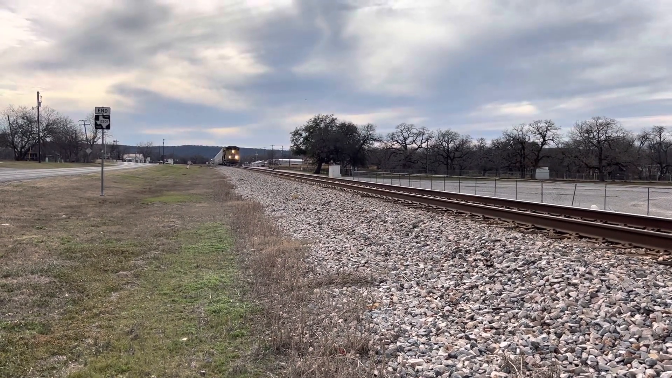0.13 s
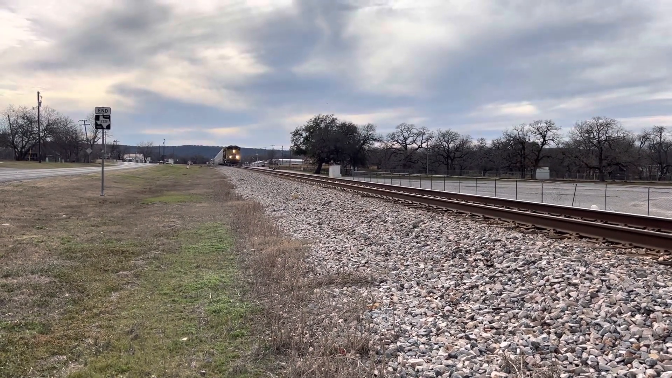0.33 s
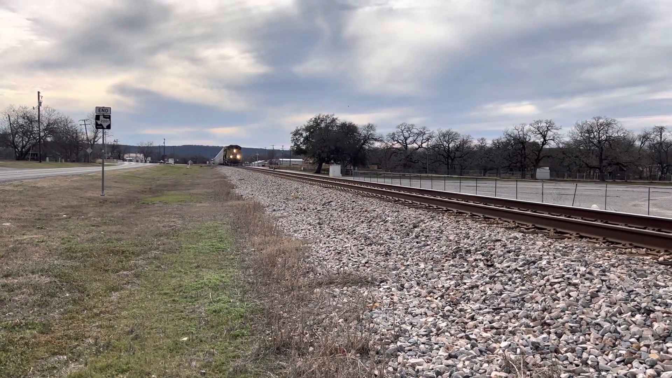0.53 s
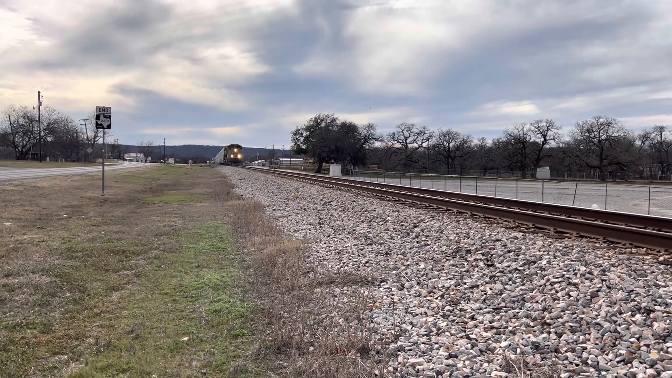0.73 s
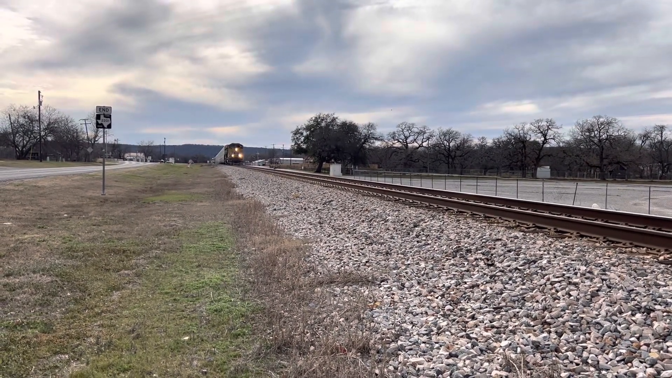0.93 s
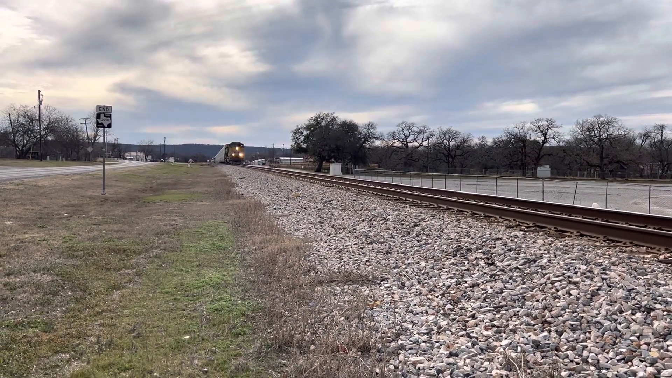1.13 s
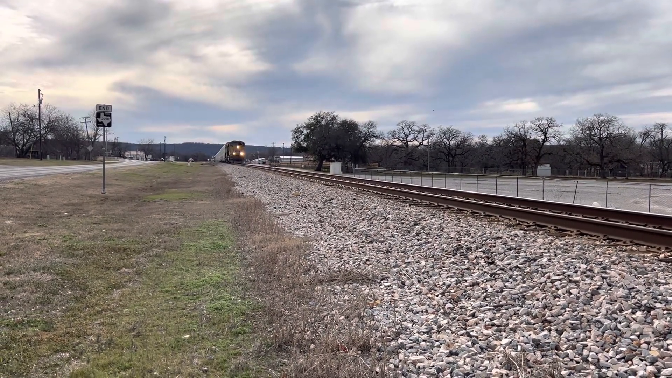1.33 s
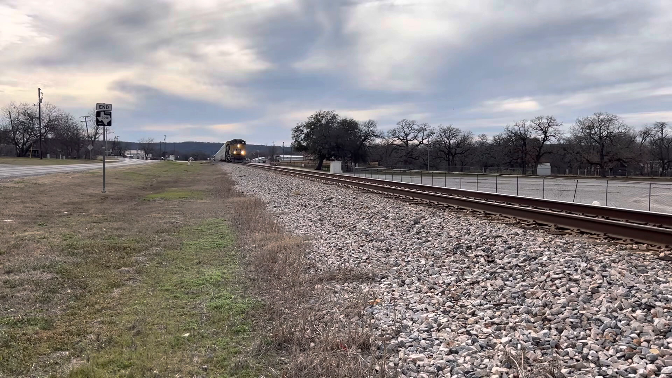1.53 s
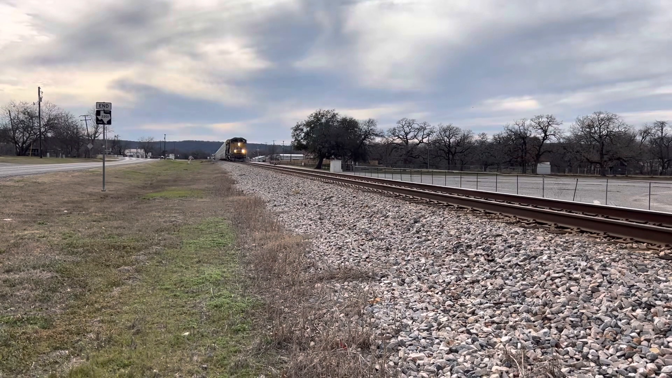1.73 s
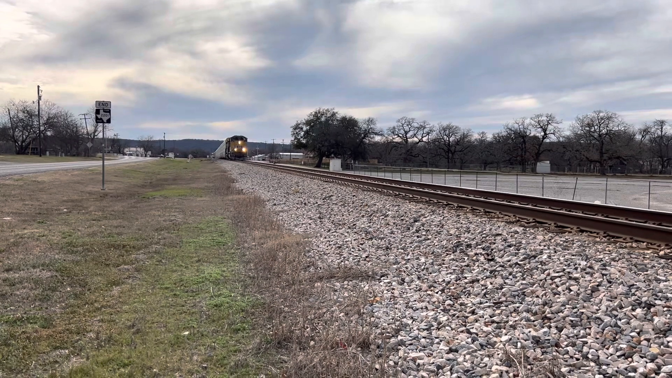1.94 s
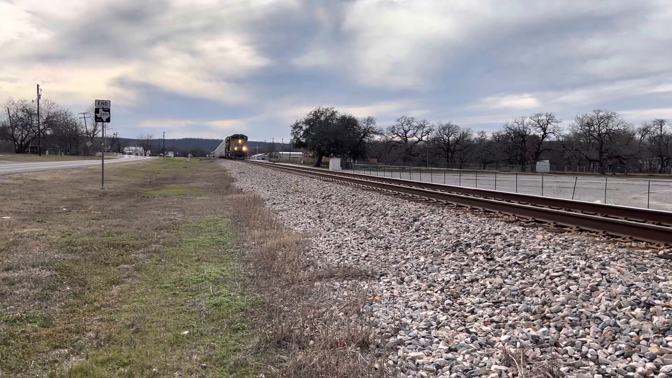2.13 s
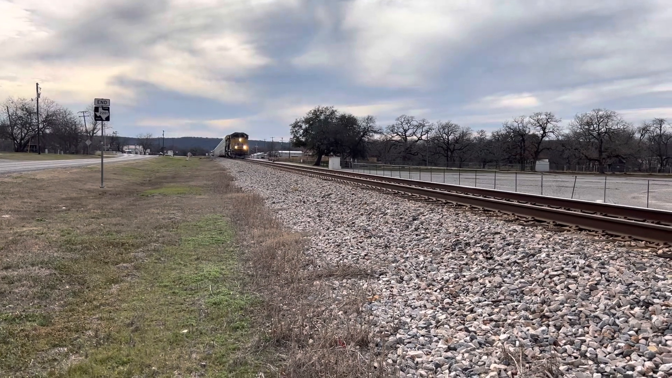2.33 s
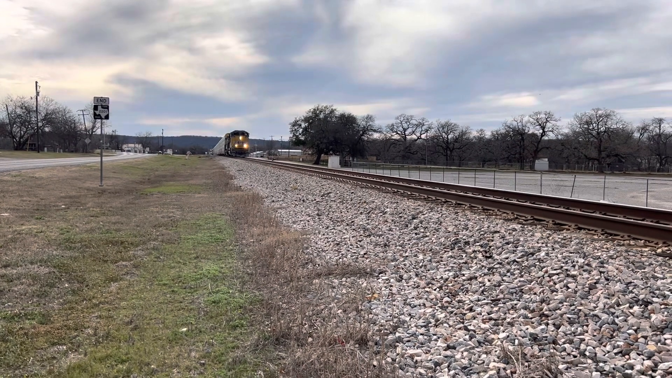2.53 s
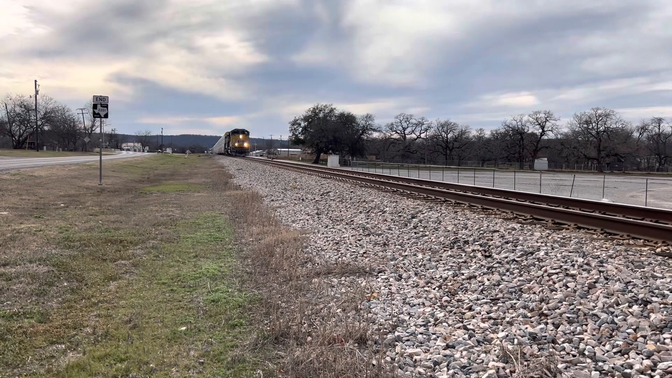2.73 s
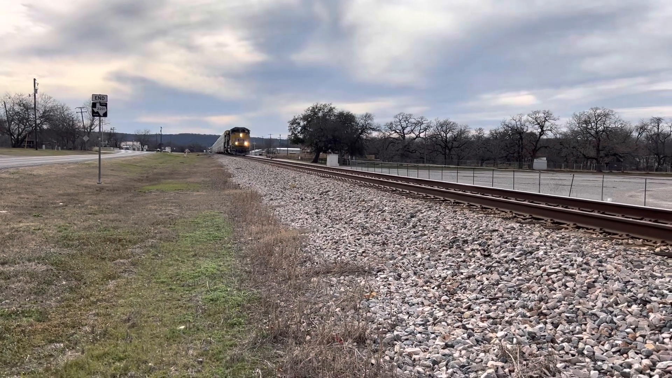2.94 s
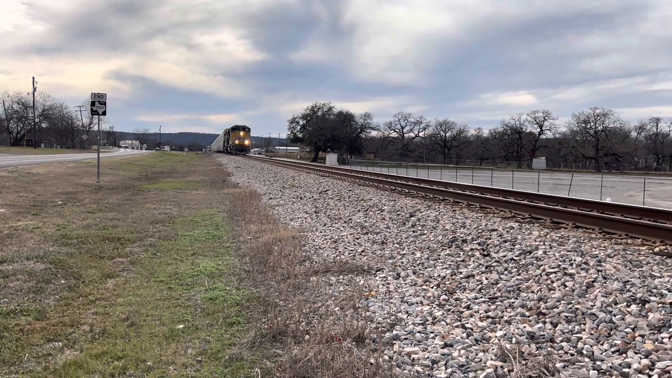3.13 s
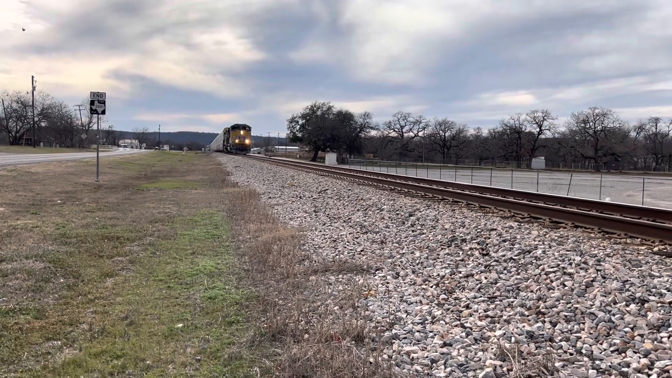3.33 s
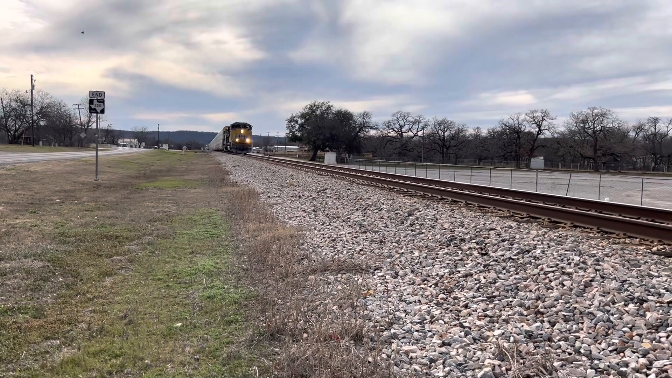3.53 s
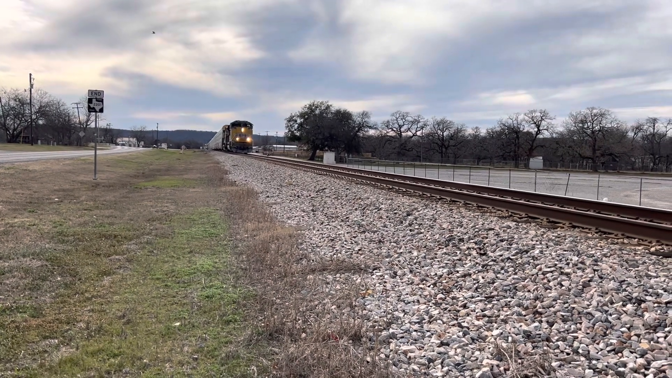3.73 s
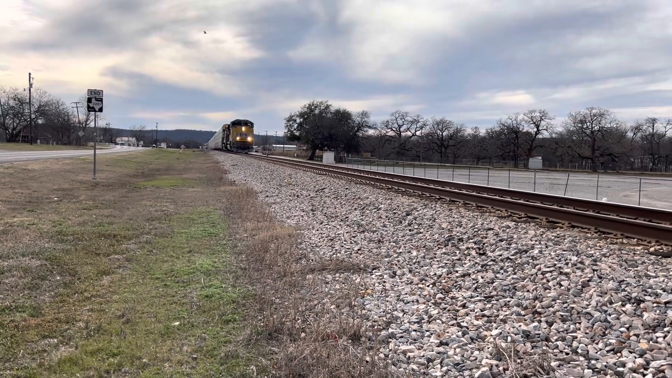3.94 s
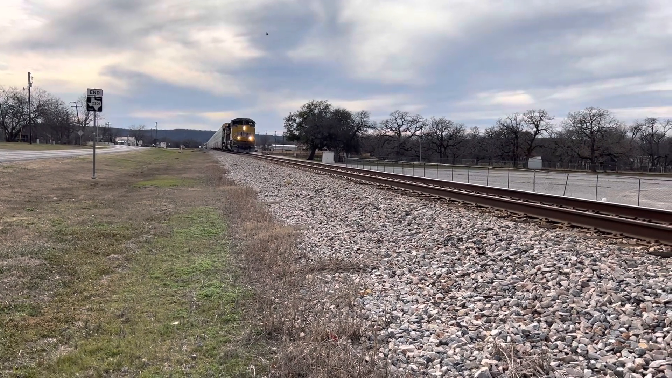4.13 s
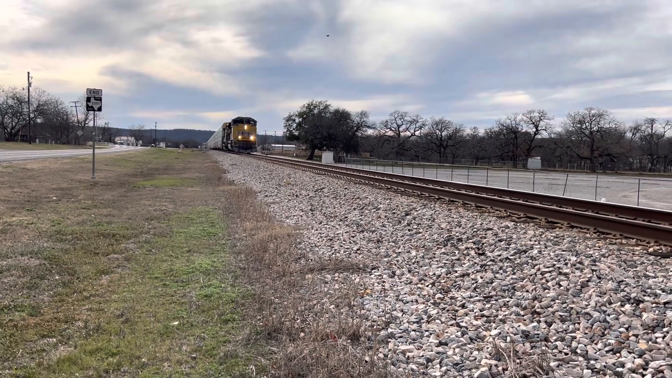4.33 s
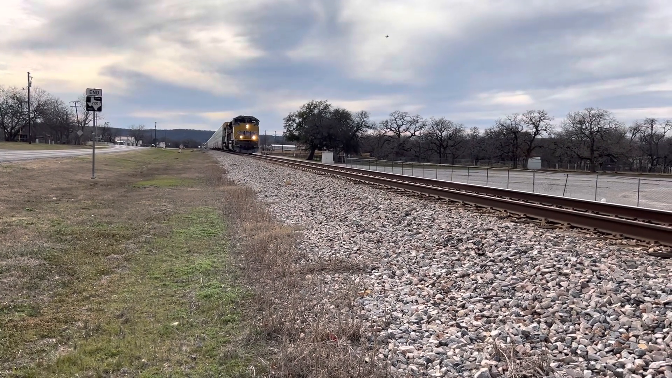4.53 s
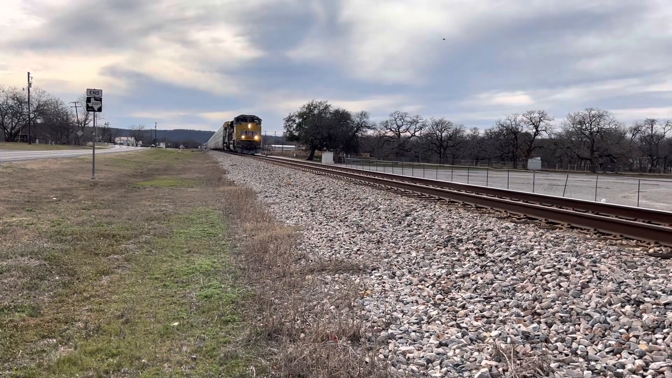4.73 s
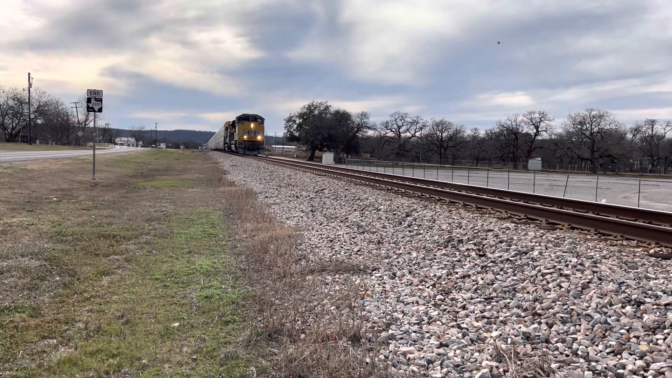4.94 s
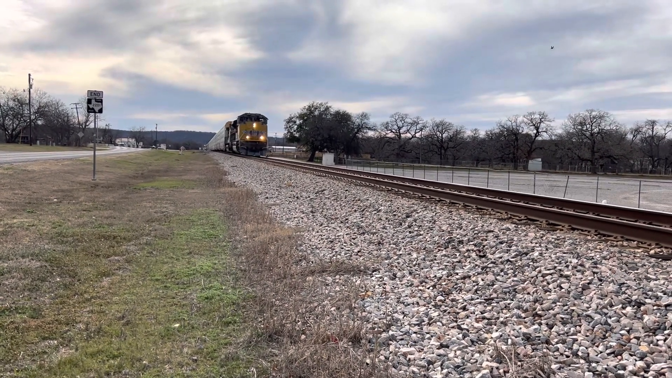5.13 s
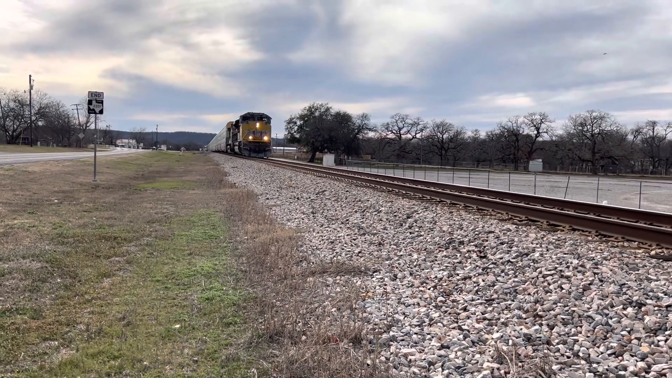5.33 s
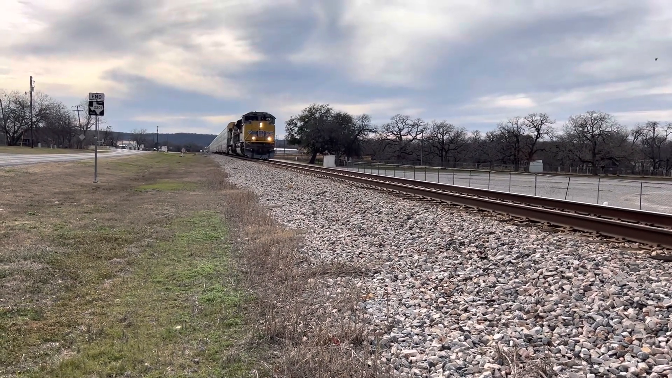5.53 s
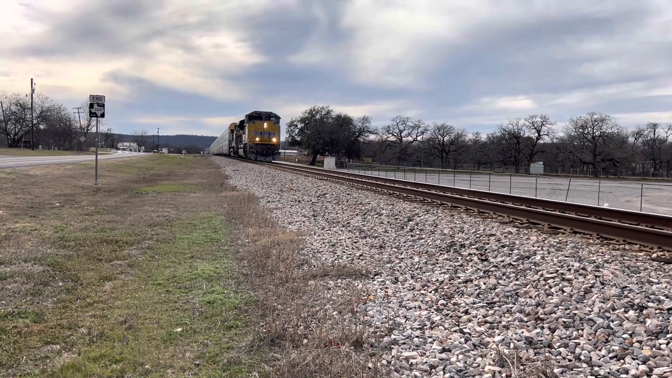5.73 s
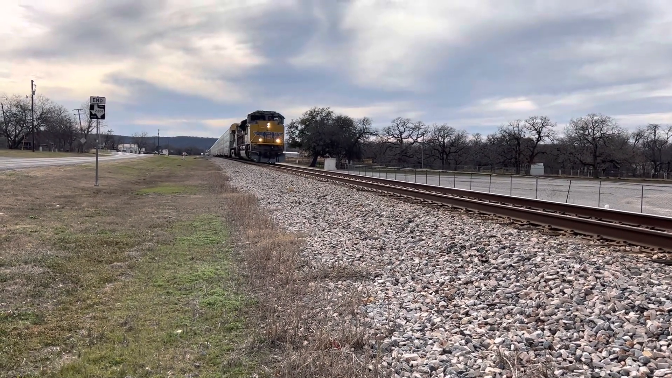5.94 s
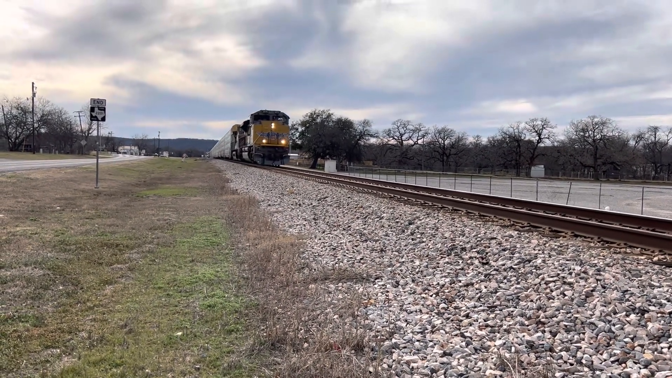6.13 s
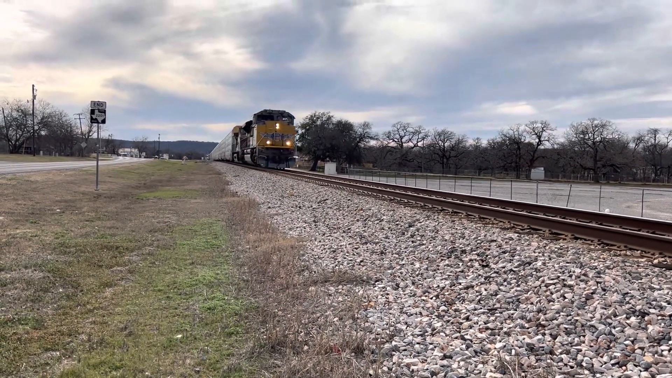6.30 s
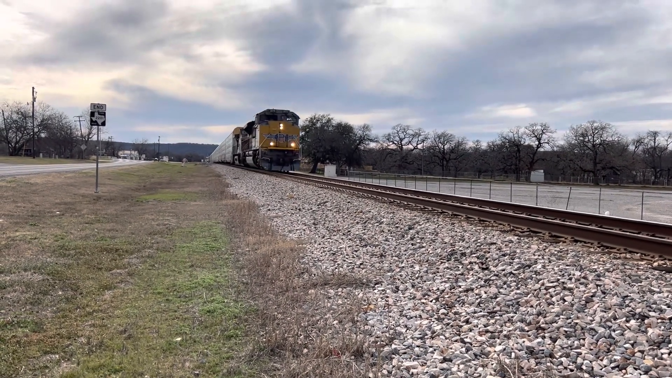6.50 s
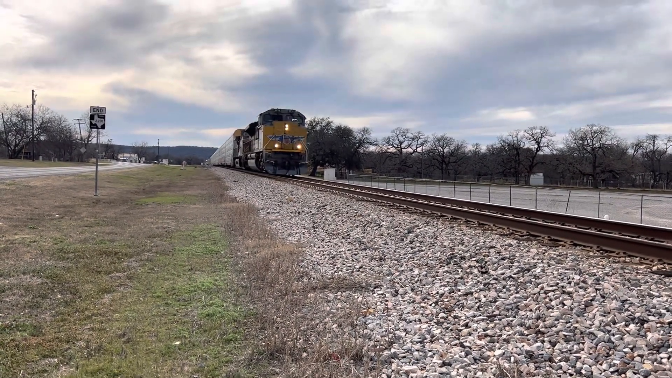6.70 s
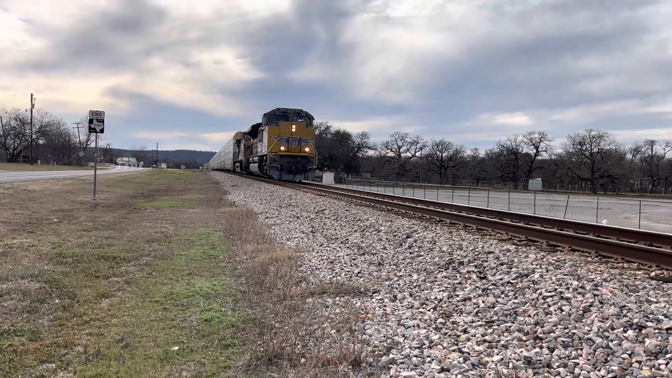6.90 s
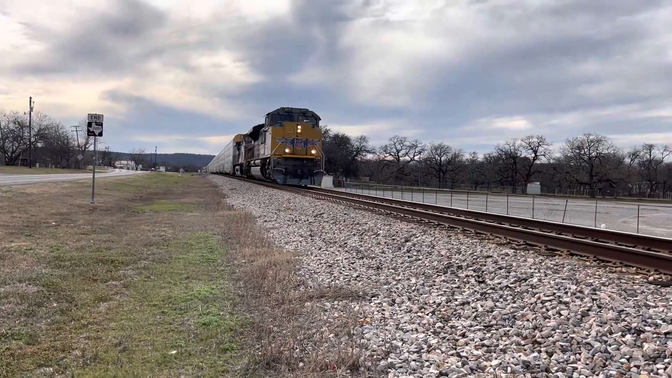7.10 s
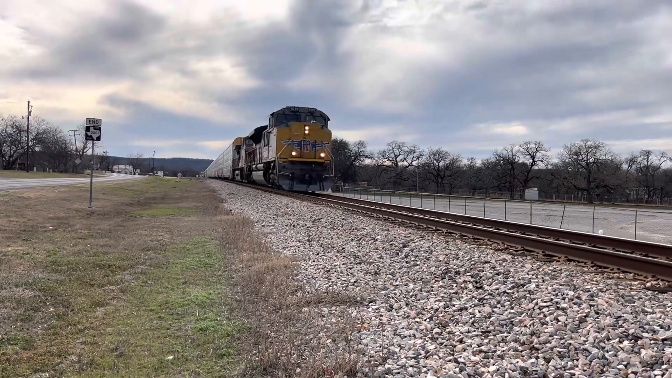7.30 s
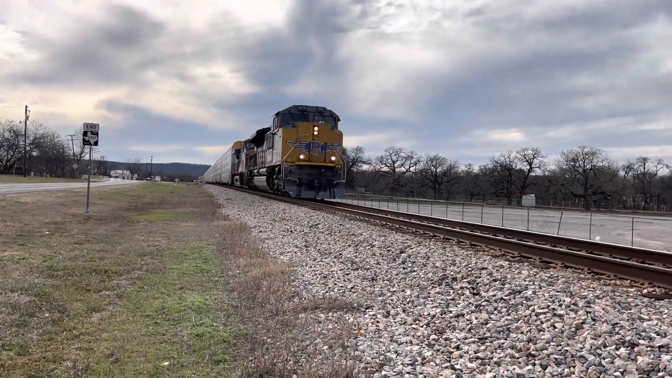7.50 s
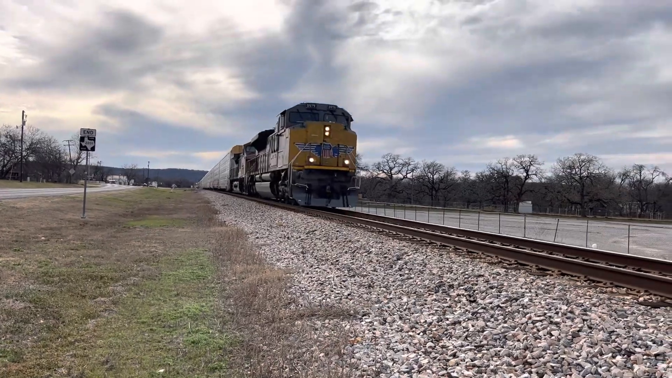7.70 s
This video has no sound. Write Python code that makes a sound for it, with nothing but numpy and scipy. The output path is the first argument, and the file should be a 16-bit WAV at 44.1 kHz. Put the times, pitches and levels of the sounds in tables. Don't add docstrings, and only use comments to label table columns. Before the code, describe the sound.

Distant locomotives throb and hum steadily louder from the trackside, with faint rail zings, an air hiss, one wind thump, and a brightening final roar.

```python
import sys
import numpy as np
from scipy import signal
from scipy.fft import rfft, irfft, next_fast_len
from scipy.io import wavfile
from scipy.ndimage import uniform_filter1d, map_coordinates

SR = 44100
rng = np.random.default_rng(int(sys.argv[2]) if len(sys.argv) > 2 else 0)


def linear_from_db(decibels):
    return 10 ** (np.asarray(decibels, float) / 20)


def unload_wav(signal):
    wavfile.write(
        sys.argv[1],
        SR,
        np.round(np.clip(np.atleast_2d(signal).T, -1, 1) * 32767).astype(np.int16),
    )


N = 346615
TIME = np.arange(N) / SR


def unit(x):
    return x / np.sqrt(np.mean(x ** 2) + 1e-20)


def along(points, hz):
    f, v = np.transpose(points)
    return np.interp(np.log(hz + 1), np.log(f + 1), v)


def colour(spectrum):
    return lambda hz: linear_from_db(along(spectrum, hz))


def wobble(rate):
    knots = rng.standard_normal(int(N * rate / SR) + 4)
    return map_coordinates(knots, [np.arange(N) * rate / SR])


def bell(s, length):
    return np.exp(-2 * (2 * (TIME - s) / length) ** 2)


def tone(hz, rough):
    return np.sqrt(2) * np.sin(2 * np.pi * np.cumsum(hz) / SR + rough * wobble(12))


def nearness():
    arrival_s = 9.147
    return -20 * np.log10(arrival_s - TIME)


def filtered(x, response):
    m = next_fast_len(N + SR // 2)
    return irfft(rfft(x, m) * response(np.fft.rfftfreq(m, 1 / SR)), m)[..., :N]


def rush(gain, alike, lead, patchy_db):
    z = signal.stft(rng.standard_normal((2, N)), nperseg=512)[2]
    field = rng.standard_normal(z.shape[1:])
    field = uniform_filter1d(uniform_filter1d(field, 5, 0), 12, 1)
    pair = signal.istft(z * linear_from_db(patchy_db * unit(field)), nperseg=512)[1][:, :N]

    def mix(hz):
        turn = np.arccos(np.clip(alike(hz), -1, 1)) / 2
        return gain(hz) * np.array([np.cos(turn), np.sin(turn)])

    def shift(hz):
        return np.exp(.5j * lead(hz) * np.array([[-1], [1]]))

    mid, side = filtered(pair, mix)
    return unit(filtered(np.array([mid + side, mid - side]), shift))


# frequency in Hz, likeness from 0 to 1.
PORT_LIKENESS = [(50, .995), (100, .988), (170, .95), (270, .94), (400, .8), (650, .55), (1000, .2),
                 (1500, .4), (2200, .72), (2800, .6), (3400, .5), (4000, .72), (5000, .4), (8000, .45)]
# frequency in Hz, lead of the right in radians.
RIGHT_LEAD = [(50, -.05), (200, -.17), (400, .25), (650, -.2), (800, -.7), (1200, -1.3), (1500, -3.1),
              (1800, -4.5), (2200, -6.5), (2800, -7.5), (3400, -7.1), (4000, -6.7), (8000, -6.7)]
# frequency in Hz, left over right in dB.
LEFT_OVER_RIGHT = [(50, .4), (550, 0), (800, 1.5), (1200, 1), (1600, -1.5), (2200, -.3), (3200, 2.5),
                   (4000, 1.5), (6000, 2.5), (7500, 0)]


def ahead(gain, patchy_db):
    noise = rush(gain, lambda hz: along(PORT_LIKENESS, hz), lambda hz: along(RIGHT_LEAD, hz), patchy_db)
    return filtered(noise, lambda hz: linear_from_db(along(LEFT_OVER_RIGHT, hz) * np.array([[.5], [-.5]])))


# time in seconds, level of the firing order in dB.
FIRING = [(0, -27), (1.5, -27), (2.2, -24), (2.7, -28), (3.05, -23.5), (3.35, -26), (3.75, -20.5),
          (4.25, -23.5), (4.8, -20), (5.3, -24.5), (6, -20.5), (6.5, -20.5), (7.2, -19), (7.55, -17.5),
          (7.86, -22.5)]


def firing_db():
    s, db = np.transpose(FIRING)
    return np.interp(TIME, s, db)


# order in cycles, level in dB, unsteadiness in dB.
ENGINE_ORDERS = [(5.87, -27.5, 1), (7.02, -11.5, 1.5), (8.026, 0, 0.96), (8.954, -9.5, 1.5),
                 (10.04, -17, 2), (11.02, -19, 2), (11.875, -15, 2), (12.93, -18, 1.5), (15.29, -20.5, 2.5),
                 (16.2, -26, 5.5), (17.96, -28.5, 2.5), (23.5, -37, 7), (27.37, -38.5, 4)]


def exhaust():
    cycle = 2 * np.pi * 51.7 / 8 * TIME
    lines = 0
    for order, db, drift in ENGINE_ORDERS:
        strength = linear_from_db(db + drift * wobble(2.49))
        phase = 0.21 * drift * wobble(1.475) + 2 * np.pi * rng.random()
        lines = lines + strength * np.sin(order * cycle + phase)
    lines = np.sqrt(2) * linear_from_db(firing_db()) * lines
    return np.array([lines, np.roll(lines, 9)]) * linear_from_db([[.2], [-.2]])


# frequency in Hz, density in dB per Hz.
RUMBLE = [(15, -44.5), (30, -22.5), (42, -10.5), (52, 2), (64, -8), (81, -6), (102, -10.5), (140, -15.5),
          (200, -19.5), (240, -28.5), (350, -31.5), (460, -71.5), (800, -120)]


def engine_rumble():
    carried_db = uniform_filter1d(firing_db(), size=SR)
    follows_db = 0.99 * (carried_db - carried_db.mean())
    level_db = -27 + 0.42 * nearness() + follows_db
    return linear_from_db(level_db + 0.57 * wobble(2.4)) * ahead(colour(RUMBLE), patchy_db=1.0)


# frequency in Hz, density in dB per Hz.
ROAR = [(150, -34), (250, -3), (500, -5), (1000, -11.5), (2000, -18.5), (3200, -27), (5000, -33.5),
        (7000, -43.5), (9000, -45), (12000, -79.5), (20000, -120)]
# frequency in Hz, density in dB per Hz.
HISS = [(1500, -42), (3000, -10), (5000, -6.5), (6000, 0.5), (7500, 1), (9000, -0.5), (12000, -46.5)]


def roar():
    near_db = nearness()
    broad = linear_from_db(1.293 * near_db - 29.5 + 0.39 * wobble(4.9)) * ahead(colour(ROAR), patchy_db=1.13)
    hiss = linear_from_db(4.1 * near_db - 45.5 + 0.55 * wobble(2.1)) * ahead(colour(HISS), patchy_db=4.0)
    return broad + hiss


# centre in Hz, width in Hz, level in dB.
HUM = [(781, 97, -2), (813, 76, -3), (1184, 99, -7), (1545, 120, -13), (1961, 86, -22), (2753, 50, -19.5),
       (2880, 30, -23), (2986, 32, -25), (3944, 84, -27.5)]


def hum():
    clears_s, clearing_s, screen_db = 1.64, 0.22, -5.5
    screened_db = screen_db / (1 + np.exp((TIME - clears_s) / clearing_s))
    level_db = -36.5 + 0.69 * nearness() + screened_db

    def bands(hz):
        power = sum((linear_from_db(db) / (1 + (2 * (hz - centre) / width) ** 2)) ** 2 for centre, width, db in HUM)
        return np.sqrt(power)

    return linear_from_db(level_db + 0.55 * wobble(3.23)) * ahead(bands, patchy_db=1.0)


# starting pitch in Hz, drift in Hz per second, level in dB at 1 s away,
# growth with nearness in dB per dB, roughness in radians.
WHINES = [(817.4, -0.47, -45, 0.79, 1.5), (1385, 4, -67, .75, .4), (385.7, 0.22, -35.5, 1.59, 2.45),
          (98.4, -0.07, -33, .9, 0.6), (1200, -1, -54.5, 1.2, 1.8)]
# centre in seconds, pitch in Hz, level in dB, length in seconds, roughness in radians.
FLARES = [
    (5.57, 1170, -53, 0.59, 1),
    (7.13, 1200, -47.5, 2.03, 0.46),
    (6.83, 155.5, -40, 0.34, 0.44),
    (7.28, 176.5, -39.5, 0.87, .6),
    (7.7, 115.5, -32, 0.8, 0.35),
    (6.04, 99.3, -36, 0.55, 0.5),
          (6.75, 5580, -70, 1.1, 2.5),
    (6.9, 3820, -65, .5, 2.5),
    (7.16, 2500, -59, .3, 2.5),
    (7.65, 1402, -57, .6, .3),
]


def gear_whines():
    near_db, sound = nearness(), 0
    for hz, drift, db, grows, rough in WHINES:
        level = linear_from_db(db + grows * near_db + 2.23 * wobble(7))
        sound = sound + level * tone(hz + drift * TIME, rough)
    for s, hz, db, length, rough in FLARES:
        level = linear_from_db(db + 0.92 * wobble(7)) * bell(s, length)
        sound = sound + level * tone(np.full(N, hz), rough)
    return sound


# centre in seconds, level in dB, length in seconds.
VENTS = [
    (2.214, -47, 0.44),
    (2.49, -62.5, 0.27),
]
# frequency in Hz, density in dB per Hz.
VENT_SPECTRUM = [(900, -30), (1900, -1.5), (3000, -0.5), (4300, -4), (6000, -12.5), (8500, -28),
                 (9600, -60), (18000, -120)]


def valve():
    blast = ahead(colour(VENT_SPECTRUM), patchy_db=0.5)
    return sum(linear_from_db(db) * bell(s, length) for s, db, length in VENTS) * blast


# frequency in Hz, density in dB per Hz.
LOW_SONG = [(7000, -69), (8200, -31.5), (8800, -1), (9300, 5.5), (9700, -7.5), (10300, 1), (11600, 1),
            (12300, -10.5), (14000, -56)]
# frequency in Hz, density in dB per Hz.
HIGH_SONG = [(9500, -55.5), (10600, -13), (11200, 3.5), (12300, 1.5), (13000, -3), (14200, 2.5),
             (15600, -3), (16500, -38.5)]
# frequency in Hz, density in dB per Hz.
ZING = [(9500, -77), (11000, -21.5), (12500, -5), (14000, -11.5), (15300, -2), (16500, -3.5)]
# time in seconds, peak level in dB.
JOINTS = [
    (.214, -55),
    (1.139, -53),
    (1.284, -40),
    (3.594, -53),
    (3.9125, -42),
    (4.717, -38),
    (4.744, -42),
    (5.49, -47),
    (5.946, -48),
    (7.473, -46),
]


def rails():
    grain = linear_from_db(4.5 * rng.standard_normal(size=900))
    grain_hz = np.linspace(0, SR / 2, len(grain))

    def song(spectrum, patchy_db):
        return rush(lambda hz: colour(spectrum)(hz) * np.interp(hz, grain_hz, grain),
                    lambda hz: .99 + 0 * hz,
                    lambda hz: 2 * np.pi * (hz - 12050) / 3650, patchy_db)

    low_db = -20 * np.log10(linear_from_db(86.5 - 5 * TIME) + linear_from_db(53.5))
    high_db = -64.5 + 0.7 * TIME + 1.2 * wobble(1.5)
    bursts, t60 = 0, 0.29
    for s, db in JOINTS:
        age = np.clip(TIME - s + .006, 0, None)
        bursts = bursts + linear_from_db(db - 1.5 - 60 * age / t60) * (1 - np.exp(-age / .005))
    swell = .7 * wobble(6)
    low = linear_from_db(low_db + swell) * song(LOW_SONG, patchy_db=1.1)
    high = linear_from_db(high_db + swell) * song(HIGH_SONG, patchy_db=1.1)
    return low + high + bursts * song(ZING, patchy_db=2.5)


# time in seconds, level in dB.
THUMPS = [(3.6, -27.5), (3.629, -24), (3.647, -18), (3.726, -13.5), (3.745, -15.5), (3.77, -21.5),
          (3.797, -18.5), (3.82, -24.5), (3.85, -28), (3.89, -23.5), (3.925, -17.5), (4.5, -30.5),
          (5.326, -25.5)]


def thumps():
    t = np.arange(-2048, 2048) / SR
    hardest_db = max(db for s, db in THUMPS)
    x = np.zeros((2, N))
    for s, db in THUMPS:
        top_hz = 624 * 2 ** ((db - hardest_db) / 7.5)
        shape = np.exp(-2 * (t * top_hz / 5.6) ** 2)
        noise = rng.standard_normal(len(t)) + 0.23 * rng.standard_normal((2, len(t)))
        band = signal.butter(3, [50, top_hz], "band", fs=SR, output="sos")
        puff = signal.sosfiltfilt(band, noise)
        puff = shape * signal.lfilter([1], [1, -.99], puff)
        level = linear_from_db(db) / np.sqrt(np.mean(puff ** 2) / np.mean(shape ** 2))
        x[:, round(s * SR) - len(t) // 2:][:, :len(t)] += level * puff
    return x


def gust():
    spectrum = [(20, -40.5), (45, -15.5), (70, 7), (120, -5), (250, -14.0), (600, -109)]  # Hz, dB per Hz
    low = rush(colour(spectrum), lambda hz: 0.95 + 0 * hz, lambda hz: 0 * hz, patchy_db=3.5)
    calm_db, peak_db, peak_s, rise_s, fall_s = -46.5, -27, 3.84, 0.53, 1.13
    late = TIME - peak_s
    rise = np.exp(-(late / np.where(late < 0, rise_s, fall_s)) ** 2 / 2)
    return linear_from_db(calm_db + (peak_db - calm_db) * rise + 1.9 * wobble(18)) * low


def car():
    hz = np.minimum(112.5 + 22 * TIME, 140.5)
    fade = np.clip((2.4 - TIME) / 0.23, 0, 1)
    return linear_from_db(-44 - 2.6 * TIME + .9 * wobble(4)) * fade * tone(hz, rough=0.17)


# time in seconds, peak level in dB, ring pitch in Hz, ring level in dB,
# left over right in dB.
TICKS = [
    (1.1692, -31.5, 620, -28, 19),
    (1.1815, -35.5, 1690, -38, 8),
    (1.1877, -34, 1740, -34, 20),
    (5.78, -52, 1700, -70, 0),
    (6.2, -54, 1700, -70, 0),
]


def ticks():
    cracks, rings, t = np.zeros((2, N)), np.zeros(N), np.arange(SR // 20) / SR
    for s, db, hz, ring_db, lean_db in TICKS:
        decay = linear_from_db(db + 4 - 60 * t / 0.0056) + linear_from_db(db - 15 - 60 * t / 0.1)
        crack = decay * linear_from_db([[0], [-lean_db]]) * rng.standard_normal(len(t))
        cracks[:, round(s * SR):][:, :len(t)] += crack
        ring = linear_from_db(ring_db - 60 * t / 0.021) * (1 - np.exp(-t / 0.00043))
        rings[round(s * SR) - 44:][:len(t)] += ring * np.sin(2 * np.pi * hz * t)
    cracks[0] += linear_from_db(-46) * bell(1.165, 0.02) * rng.standard_normal(N)
    band = signal.butter(4, [3300, 8300], "band", fs=SR, output="sos")
    return signal.sosfilt(band, cracks) + rings * linear_from_db([[2.5], [-2.5]])


# centre in seconds, pitch in Hz, glide in Hz, level in dB, length in seconds.
CHIPS = [
    (.29, 5200, 600, -73, .012),
    (.335, 4900, 500, -66, .014),
    (.362, 4050, -200, -71, .01),
]


def bird():
    sound = 0
    for s, hz, glide, db, length in CHIPS:
        t = TIME - s
        whistle = np.sin(2 * np.pi * (hz + glide * t / length / 2) * t)
        sound = sound + linear_from_db(db) * np.exp(-2 * (t / length) ** 2) * whistle
    return sound


# frequency in Hz, density in dB per Hz.
FIELD = [(100, -19.5), (200, -3), (500, -5), (1000, -6.5), (2000, -17), (2800, -21.5), (3200, -39.5),
         (6000, -38), (7500, -57.5), (10000, -65), (20000, -120)]


def field_murmur():
    return linear_from_db(-53) * ahead(colour(FIELD), patchy_db=2.0)


def scene():
    train = exhaust() + engine_rumble() + roar() + hum() + gear_whines() + valve()
    return train + rails() + thumps() + gust() + car() + ticks() + bird() + field_murmur()


def roll_off(x):
    return signal.sosfilt(signal.butter(12, 17110, fs=SR, output="sos"), x)


def record(dry):
    heard = filtered(dry, lambda hz: (hz < 15800) / np.sqrt(1 + (36 / (hz + 1)) ** 6))
    return roll_off(heard)


dry = scene()
out = record(dry)
unload_wav(out)
```